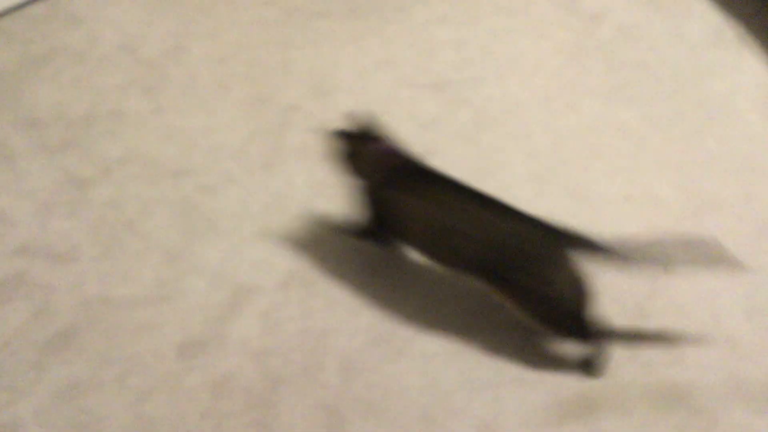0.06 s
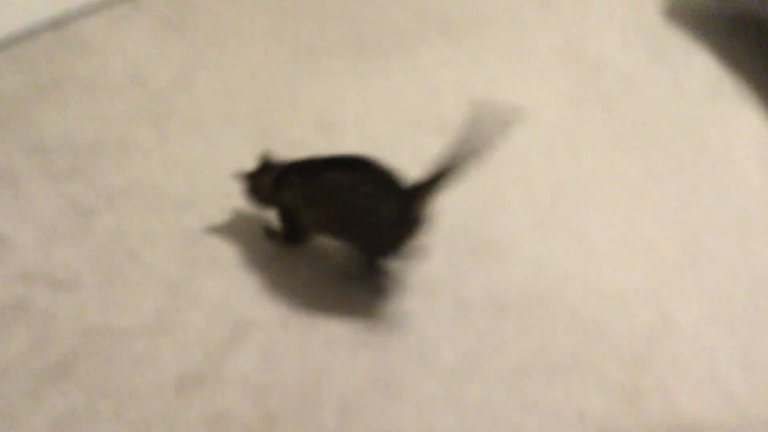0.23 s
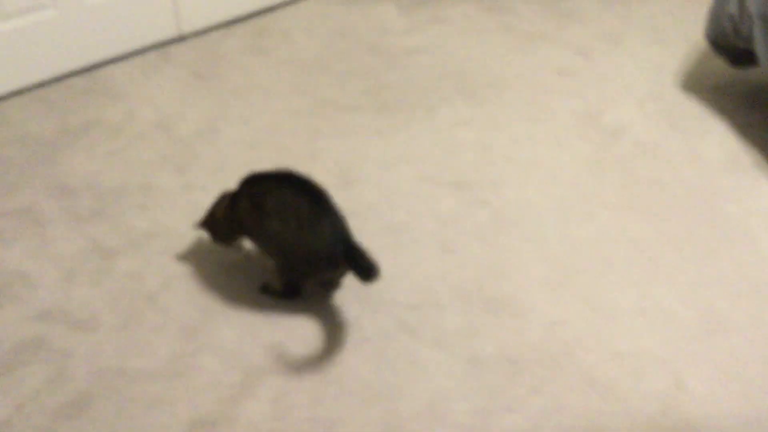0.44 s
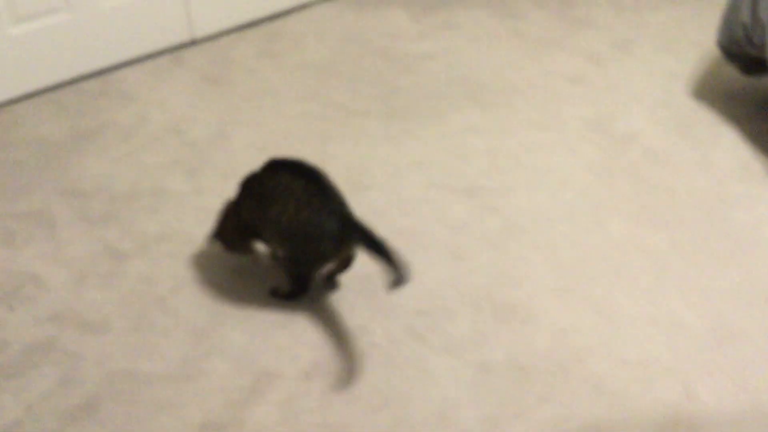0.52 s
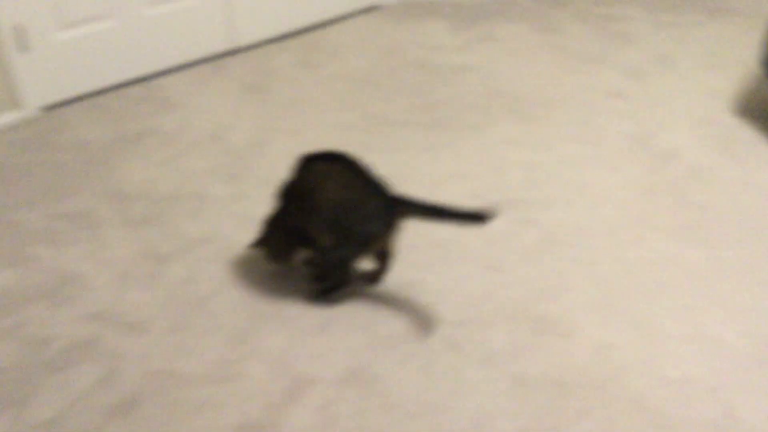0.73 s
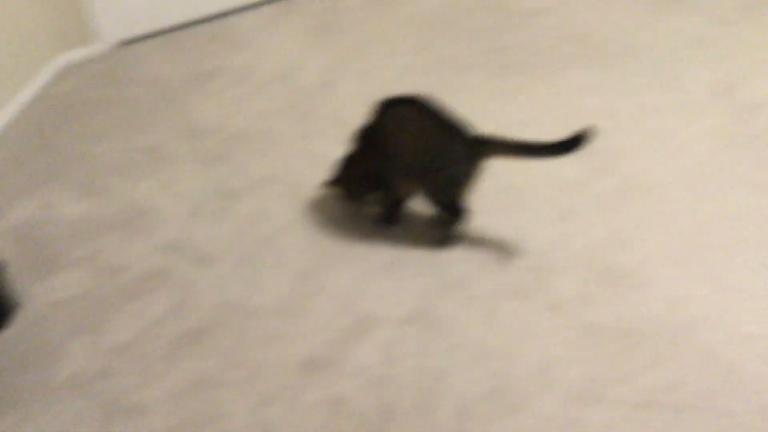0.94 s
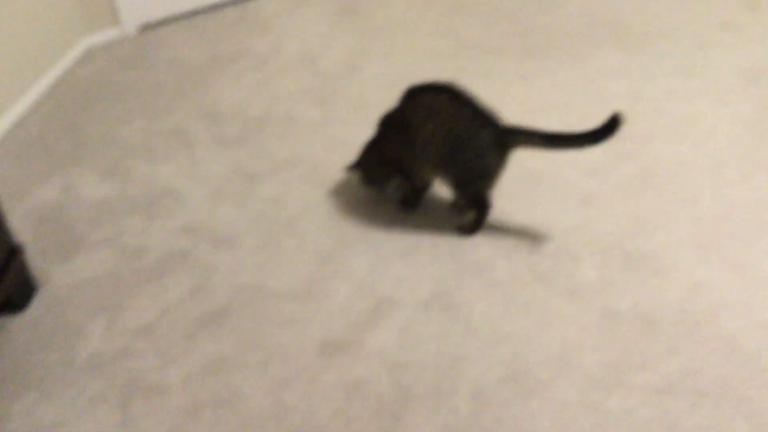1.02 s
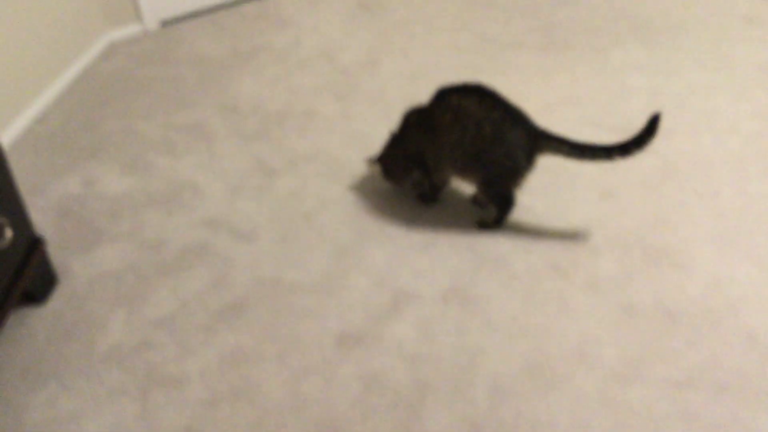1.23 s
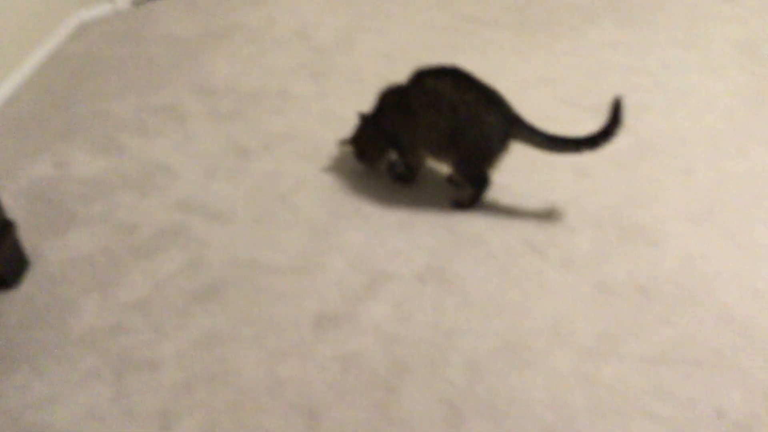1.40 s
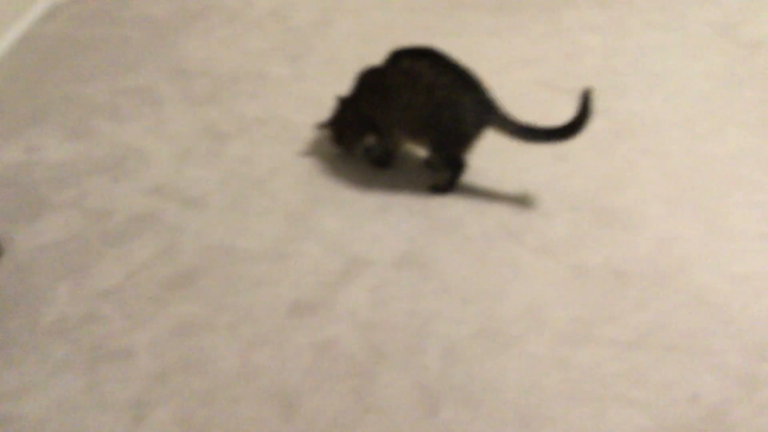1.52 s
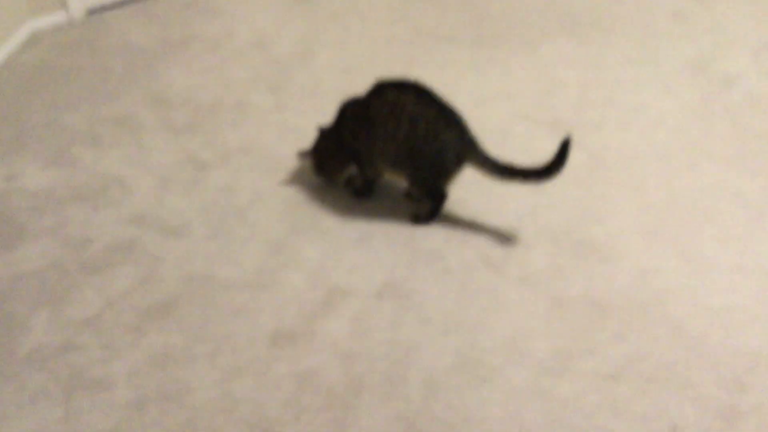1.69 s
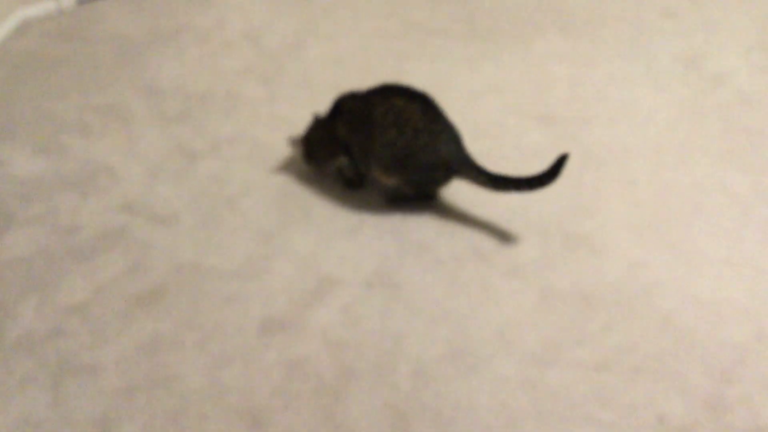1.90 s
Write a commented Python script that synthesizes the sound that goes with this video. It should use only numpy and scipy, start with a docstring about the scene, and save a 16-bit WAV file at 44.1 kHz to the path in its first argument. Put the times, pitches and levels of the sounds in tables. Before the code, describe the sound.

A tiny, high collar bell jingles in a quick flurry, then tinkles only now and then as the cat slows. Faint paw thumps, small ticks and dull taps sound in a carpeted room with a low hum.

```python
"""In a carpeted room, over a low ventilation rumble and hum, a cat bounds across the floor.
Its paws thump softly, with a few dull taps and small ticks. The small bell on its collar jingles, then
only tinkles as the cat slows: a loose pellet rolls in the metal shell and strikes it, exciting normal
modes that ring briefly and linger in the room's reverberation."""
import sys
import numpy as np
from scipy import signal
from scipy.fft import rfft, irfft
from scipy.io import wavfile

SR = 44100
rng = np.random.default_rng(int(sys.argv[2]) if len(sys.argv) > 2 else 0)


def master_out(mix):
    """Clip the mix to full scale and print it as 16-bit PCM to the path in sys.argv[1]."""
    frames = np.transpose(np.atleast_2d(mix))
    ceiling = np.clip(frames, -1, 1)
    pcm = np.round(ceiling * 32767).astype(np.int16)
    wavfile.write(sys.argv[1], SR, pcm)


N = 85995


def undb(db):
    """Amplitude ratio of a level in decibels."""
    return 10 ** (np.asarray(db) / 20)


def since(start):
    """Seconds elapsed since an onset, zero before it."""
    return np.maximum(np.arange(N) / SR - start, 0)


def ring(start, rise, t60):
    """Exponential damping: an envelope that rises quickly, then falls 60 dB in t60 seconds."""
    age = since(start)
    return (1 - np.exp(-age / rise)) * np.exp(-np.minimum(np.log(1000) * age / t60, 60))


def noise(gain_at):
    """Spectral shaping: white noise weighted by a function of frequency, scaled to unit rms."""
    f = np.maximum(np.arange(N // 2 + 1) * SR / N, 1)
    shaped = irfft(rfft(rng.standard_normal(N)) * gain_at(f), N)
    return shaped / np.std(shaped)


def coloured(spectrum):
    """Coloured noise: its spectrum joins (f/Hz, level/dB) points on a logarithmic frequency axis."""
    hz, db = np.array(spectrum).T
    return noise(lambda f: undb(np.interp(np.log(f), np.log(hz), db)))


def band(hz, width):
    """Resonance: noise in one peak, whose width is a fraction of its centre frequency."""
    return noise(lambda f: 1 / (1 + ((f / hz - hz / f) / width) ** 2))


# spectra of the ventilation rumble and the hiss: f/Hz, relative density level/dB
RUMBLE_SPECTRUM = [(13, -62), (22, -16), (59, -1.5), (91, -1.5), (233, -0.5), (260, -3.5), (298, -1),
                   (425, -8.5), (465, -8.5), (725, -17.5), (1060, -28.5), (1290, -27), (4500, -45),
                   (5850, -90.5), (9900, -120)]
HISS_SPECTRUM = [(2000, -17), (4500, 4), (9000, 6), (13500, 4.5), (16000, -17)]
# partials of the electric hum: f/Hz, level/dB
HUM_PARTIALS = [(119.5, -70), (239.3, -67.5), (366, -72), (1140, -90)]

def background():
    """Superposition of steady sources: ventilation rumble, faint hiss and electric hum."""
    hum = sum(undb(db) * np.sqrt(2) * np.sin(2 * np.pi * (hz * since(0) + rng.random()))
              for hz, db in HUM_PARTIALS)
    return undb(-55.5) * coloured(RUMBLE_SPECTRUM) + undb(-85) * coloured(HISS_SPECTRUM) + hum


# bands of the room's diffuse tail: f/Hz, relative level/dB, T60/s
ROOM_BANDS = [(494, 2, 0.2), (4930, 4.5, 0.24), (11350, -0.5, 0.27), (13360, -7, .25), (16200, -7.5, 0.183)]

def room(direct, wet_db):
    """Reverberation: a short diffuse tail follows the sound; air and carpet absorb the highest treble."""
    f = np.arange(N // 2 + 1) * SR / N
    centres, tail = np.array(ROOM_BANDS)[:, 0], 0
    for selector, (_, db, t60) in zip(np.eye(len(ROOM_BANDS)), ROOM_BANDS):
        power_share = np.interp(f, centres, selector)
        reflections = irfft(rfft(rng.standard_normal(N)) * np.sqrt(power_share), N)
        fade = ring(start=0.004, rise=0.0064, t60=t60)
        tail += undb(db) * reflections * fade / np.sqrt(np.sum(fade ** 2))
    return direct + undb(wet_db) * signal.fftconvolve(direct, tail)[:N]


# paw falls: t/s, level/dB, centre f/Hz
PAW_FALLS = [(.06, -57.5, 180), (.228, -50, 159), (0.257, -57, 130), (.55, -54, 150), (.89, -54.5, 110.5),
             (1.129, -53.5, 114), (1.519, -72, 140), (1.659, -49, 59.2), (1.74, -59, 60)]

def paws(rise_s=0.013):
    """Cushioned impact: padded feet push the carpeted floor, each a low swell that dies at once."""
    thumps = 0
    for start, db, hz in PAW_FALLS:
        rise = since(start) / rise_s
        thumps += undb(db) * band(hz, width=0.92) * rise * np.exp(1 - rise)
    return thumps


# ticks and scuffs: t/s, level/dB, centre f/Hz, width/centre, T60/s
CLAW_TICKS = [(0.222, -48.5, 705, 0.33, 0.038), (0.223, -67.5, 1470, 0.44, 0.059),
              (0.224, -70.5, 3000, 0.68, 0.11), (0.2327, -57, 6500, 0.34, .03),
              (0.912, -65, 5800, 0.27, 0.043), (1.161, -63, 8000, 0.71, 0.014),
              (1.228, -73.5, 9500, 0.81, 0.072), (1.229, -67, 2570, 0.25, 0.07),
              (1.275, -75, 8600, 0.61, 0.042), (1.275, -69.5, 2380, 0.86, 0.029),
              (1.332, -60, 1600, 1.1, 0.012), (1.535, -55, 647, 0.26, 0.012),
              (1.573, -57, 1090, 1.14, 0.033), (1.577, -54.5, 2920, 0.17, 0.013),
              (1.622, -64.5, 4200, 0.33, 0.019), (1.623, -58, 686, .6, 0.057),
              (1.638, -70, 2200, 0.7, 0.055), (1.853, -67, 9200, 0.11, 0.0094)]

def ticks():
    """Transient friction noise: tiny scratchy bursts, probably claws catching the carpet."""
    return sum(undb(db) * band(hz, width) * ring(start, 0.0004, t60)
               for start, db, hz, width, t60 in CLAW_TICKS)


# dull taps: t/s, level/dB, frequency ratio
DULL_TAPS = [(1.2305, -38, 1.01), (1.2438, -41.5, 0.93), (1.278, -36, 0.94), (1.3312, -47, 0.59),
             (1.852, -34, 0.865)]
# their modes: f/Hz at ratio 1, relative level/dB, T60/s
DAMPED_MODES = [(592, -1.5, 0.011), (728, 4.5, 0.011), (1127, -4, .018)]

def taps(rise_s=0.00094, cutoff_hz=1270):
    """Heavily damped vibration: knocks of three modes each, softened by a low-pass filter."""
    knocks = sum(undb(db + mode_db) * ring(start, rise_s, t60)
                 * np.sin(2 * np.pi * hz * ratio * since(start))
                 for start, db, ratio in DULL_TAPS for hz, mode_db, t60 in DAMPED_MODES)
    return signal.sosfilt(signal.butter(6, cutoff_hz, fs=SR, output="sos"), knocks)


MAIN_PAIR_HZ = (11408, 11466)  # the shell's two strongest modes
# course of the pellet's rolling: t/s, level/dB
ROLLING_LEVELS = [(0, -79), (.09, -76), (.15, -84), (.2, -77.5), (.245, -58), (.275, -58), (.33, -60.5),
                  (.42, -74), (0.521, -64), (.66, -74), (.79, -100)]

def rolling(width_hz=40):
    """Random excitation: the rolling pellet rubs the shell and keeps four of its modes shimmering."""
    modes = [(hz, 0) for hz in MAIN_PAIR_HZ] + [(SHELL_LOW[0][0], -14), (SHELL_TOP[0][0], -14)]
    shimmer = noise(lambda f: sum(undb(db) / (1 + (2 * (f - hz) / width_hz) ** 2) for hz, db in modes))
    return shimmer * undb(np.interp(since(0), *np.array(ROLLING_LEVELS).T))


def shell_mode(hz, t60, times, contacts, amplitudes):
    """Damped oscillator: each strike feeds in energy while contact lasts; free decay follows."""
    t, decay_rate = since(0), np.log(1000) / t60
    energy, phase = np.full(N, 1e-18), np.zeros(N)
    for start, contact, amplitude in zip(times, contacts, amplitudes):
        onset = int(start * SR)
        age = t[:N - onset]
        growth = np.minimum(age / contact, 1)
        energy_left = np.exp(-2 * decay_rate * np.maximum(age - contact, 0))
        # a strike upsets the phase as far as it outweighs the vibration already there
        weight = amplitude ** 2 / (amplitude ** 2 + energy[onset:])
        phase[onset:] += growth * weight * rng.uniform(-np.pi, np.pi)
        energy[onset:] += (amplitude * growth) ** 2 * energy_left
    return np.sqrt(2 * energy) * np.sin(2 * np.pi * hz * t + phase)


# shell modes by group, the faint side modes following the main pair: f/Hz, relative level/dB
SHELL_LOW = [(4984, 0), (5035, -5), (5270, -15), (6760, -17), (7920, -11), (12550, -9), (12617, -6)]
SHELL_MIDDLE = [(8690, -4), (8790, -7), (8925, -3)]
SHELL_SIDE = [(6780, -33), (10955, -31), (11150, -29), (11690, -29)]
SHELL_TOP = [(14762, 0), (14835, -5), (14910, -10)]
# spectrum of the contact click: f/Hz, relative density level/dB
CLICK_SPECTRUM = [(1500, -28.5), (3500, -21), (6000, -7.5), (7800, -7), (8900, 4.5), (9900, -8.5),
                  (11400, 9), (13200, 4), (14800, 4), (15400, -15.5), (16500, -16.5)]
# pellet strikes: t/s, level/dB of (click, low modes, middle modes, main pair, top modes),
# upper mode's share of the pair's energy, contact time/s
PELLET_STRIKES = [ (.002, -77, -91, -81, -77.5, -69.5, 0.6, 0.0079),
                  (.050, -80, -84, -80, -67, -80, 0.3, 0.0046),
                  (0.072, -87, -89, -77.5, -66.5, -88, 0.6, 0.0044),
                  (.201, -90, -77, -74, -75, -80, 0.4, 0.0092),
                  (0.2344, -64, -60, -75, -53.5, -70, .6, 0.00085),
                  (0.2376, -60, -52, -68, -43.5, -77, 0.99, .006),
                  (0.2506, -36.5, -63.5, -63.5, -44.5, -59, 0.45, 0.0042),
                  (0.259, -47, -53.5, -59, -47, -63, 1, 0.0023),
                  (0.264, -73, -62.5, -59.5, -36.5, -62, .9, .006),
                  (.283, -69, -60, -57, -34, -59.5, .95, 0.0039),
                  (0.3783, -48, -72, -62.5, -48.5, -63.5, 0.4, 0.00088),
                  (.391, -68, -61, -62, -54.5, -66, 0.1, 0.0085),
                  (0.406, -42, -58, -64.5, -54, -49.5, 0.9, 0.00081),
                  (0.4763, -51, -59, -69.5, -57, -72, 0.5, 0.0033),
                  (.486, -52, -77, -70, -50, -78, 0.76, .005),
                  (0.533, -35, -66, -50.5, -28.5, -47.5, 0.02, 0.00028),
                  (0.616, -59, -77, -76, -64, -65, 0.5, 0.0043),
                  (.638, -77, -81.5, -76.5, -75, -62, .3, 0.0084),
                  (0.726, -78, -92, -91.5, -72.5, -81.5, 0.4, 0.0051),
                  (0.913, -62, -80, -82.5, -58.5, -67.5, 0.6, 0.0022),
                  (.923, -55, -91, -84, -74, -73.5, .5, 0.0014),
                  (0.988, -69, -90, -69.5, -57.5, -69, .5, 0.00058),
                  (1.002, -56, -85, -81, -78, -58.5, 0.36, .002),
                  (1.412, -76, -93, -90.5, -89, -81, .5, 0.0012),
                  (1.494, -74.5, -113, -75, -85.5, -73, .5, .003),
                  (1.578, -47, -96, -84, -61.5, -61, 0.78, .002),
                  (1.655, -78, -96, -84, -72, -80, 0.55, 0.00094),
                  (1.691, -64, -104.5, -86, -92, -92.5, 0.6, 0.0011),
                  (1.803, -55.5, -88, -66.5, -82, -53.5, .5, 0.0019)]

def bell():
    """Modal excitation by impact: the pellet clicks on the shell; the spot hit decides which modes ring."""
    times, click_db, low_db, middle_db, main_db, top_db, share, contacts = np.array(PELLET_STRIKES).T
    low_t60, middle_t60, main_t60, top_t60 = 0.06, 0.056, 0.078, 0.052  # s
    groups = [(SHELL_LOW, low_db, low_t60), (SHELL_MIDDLE, middle_db, middle_t60),
              (SHELL_SIDE, main_db, main_t60), (SHELL_TOP, top_db, top_t60)]
    shell = sum(shell_mode(hz, t60, times, contacts, undb(group_db + db))
                for modes, group_db, t60 in groups for hz, db in modes)
    for hz, part in zip(MAIN_PAIR_HZ, (1 - share, share)):
        shell += shell_mode(hz, main_t60, times, contacts, undb(main_db) * np.sqrt(part))
    # a glancing blow skids for longer and stretches its click
    bursts = sum(undb(db) * ring(start, rise=contact / 2, t60=0.0034 + 3.4 * contact)
                 for start, db, contact in zip(times, click_db, contacts))
    clicks = coloured(CLICK_SPECTRUM) * bursts
    return room(shell + rolling(), wet_db=-11) + room(clicks, wet_db=-0.5)


def scene():
    """Linear superposition: the pressures of all sources add at one point."""
    return (background() + paws() + room(ticks() + taps(), wet_db=-16) + bell())[None]


def record(dry):
    """Band limiting: filters remove the bass below 36 Hz and the treble above 16.4 kHz."""
    high_pass = signal.butter(4, 36, "high", fs=SR, output="sos")
    low_pass = signal.ellip(8, 0.2, 70, 16400, fs=SR, output="sos")
    return signal.sosfilt(low_pass, signal.sosfilt(high_pass, dry))


dry = scene()
out = record(dry)
master_out(out)
```